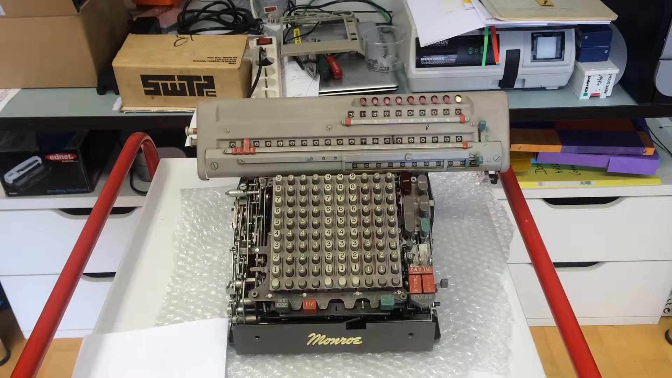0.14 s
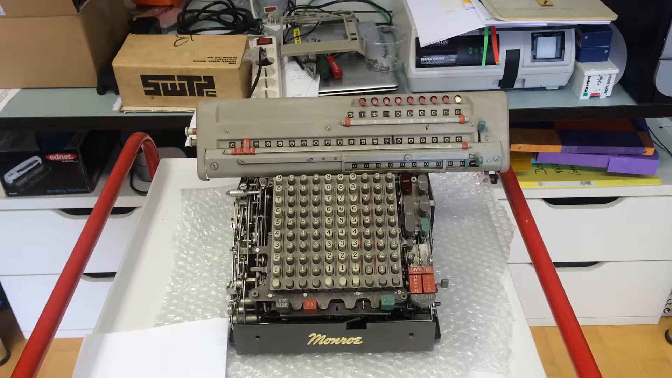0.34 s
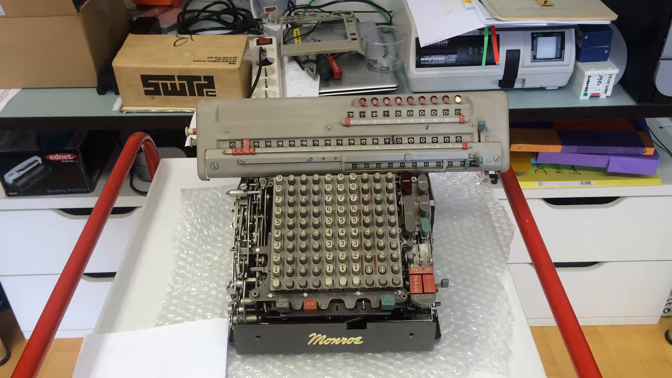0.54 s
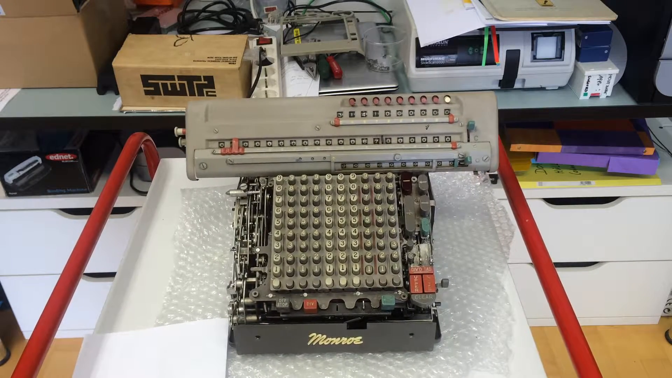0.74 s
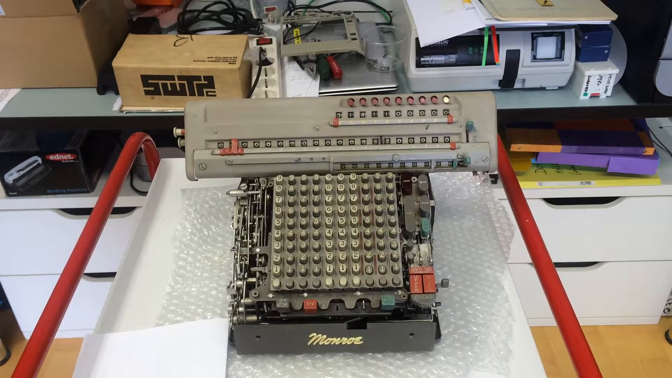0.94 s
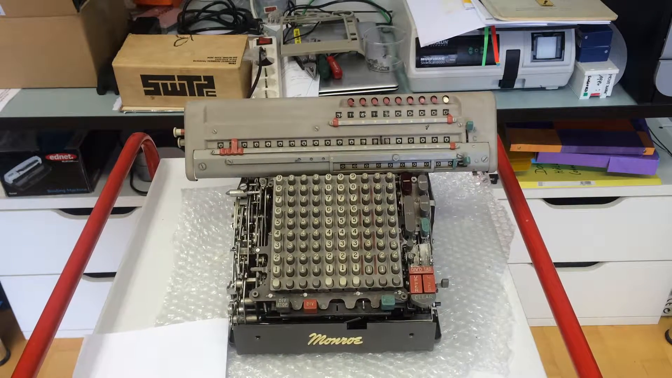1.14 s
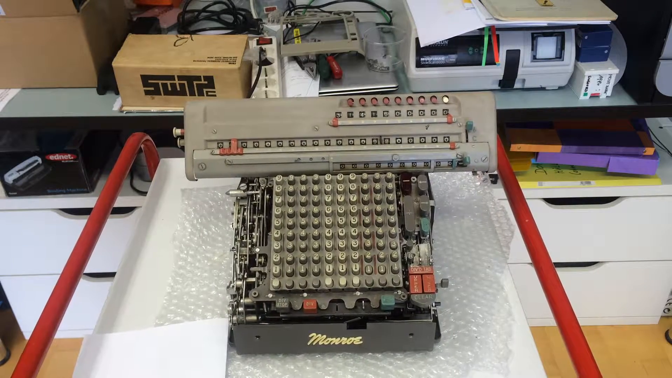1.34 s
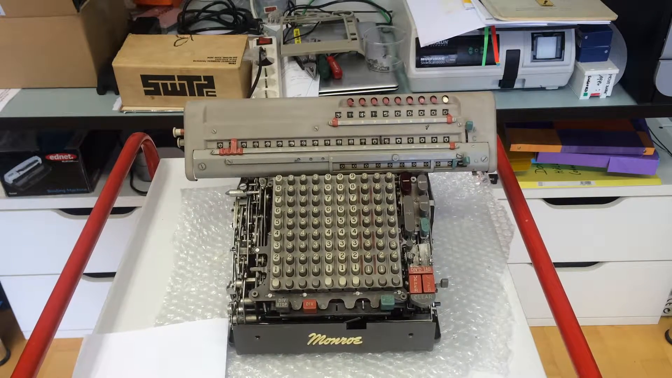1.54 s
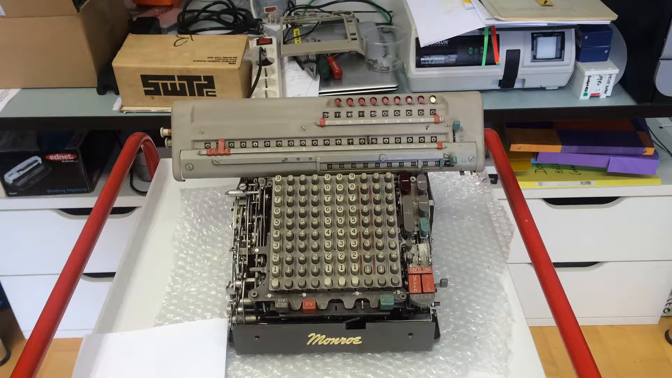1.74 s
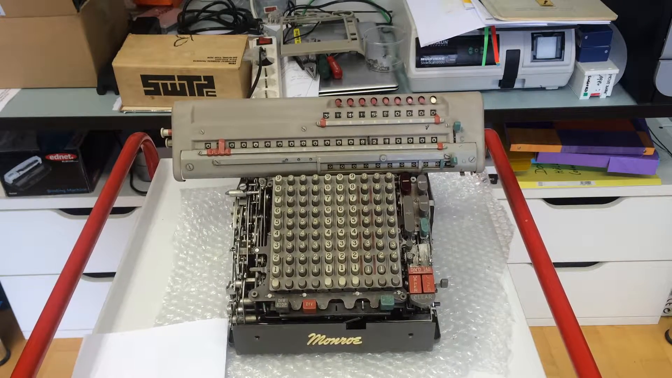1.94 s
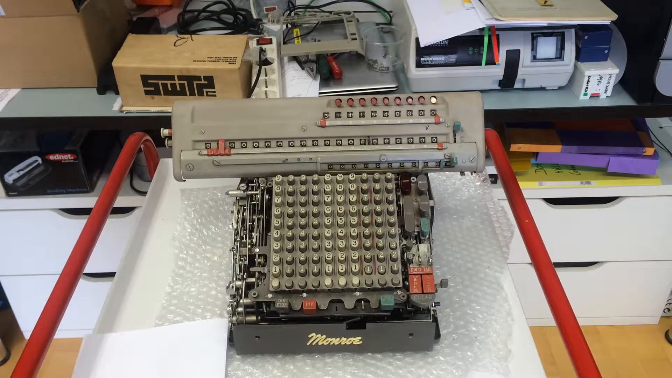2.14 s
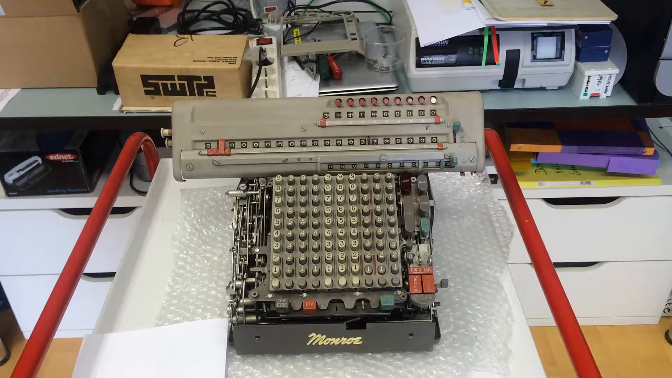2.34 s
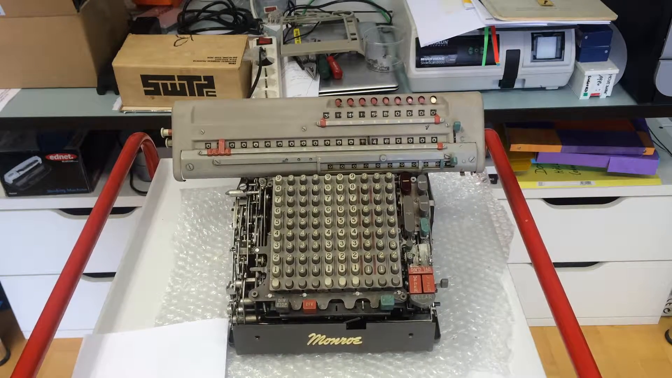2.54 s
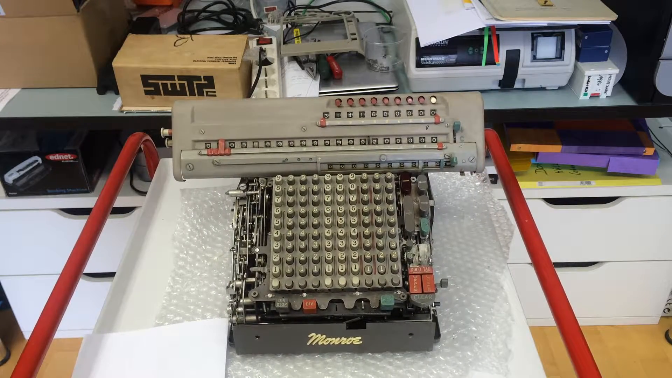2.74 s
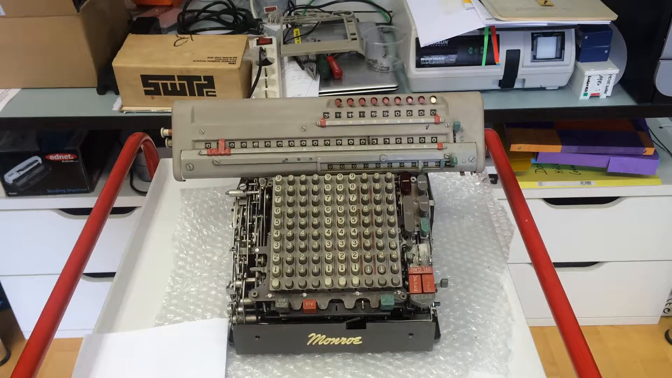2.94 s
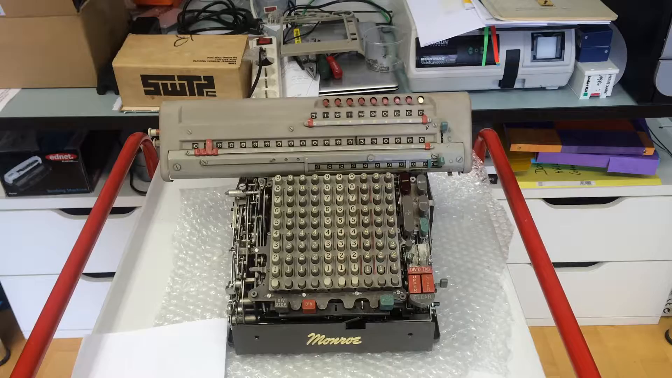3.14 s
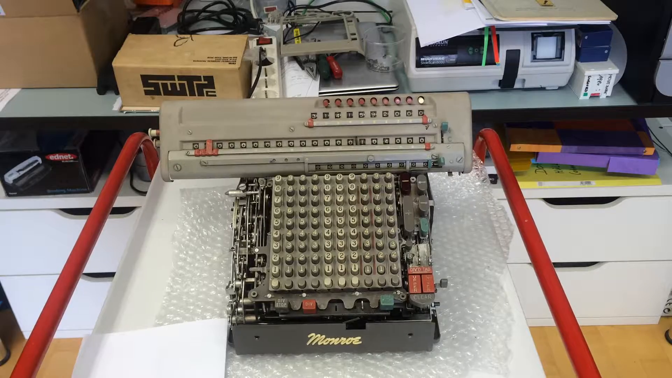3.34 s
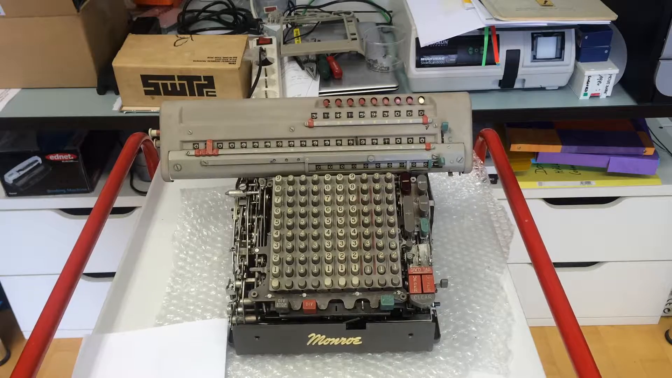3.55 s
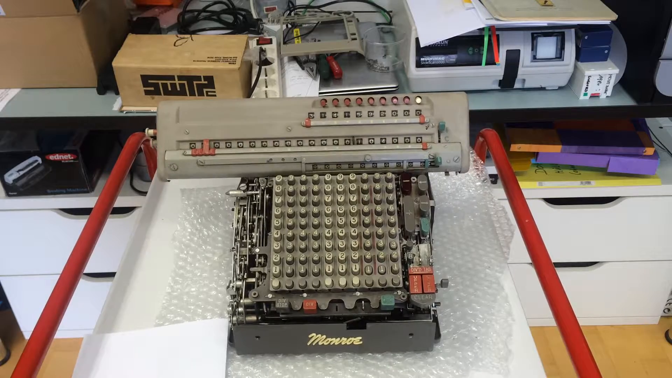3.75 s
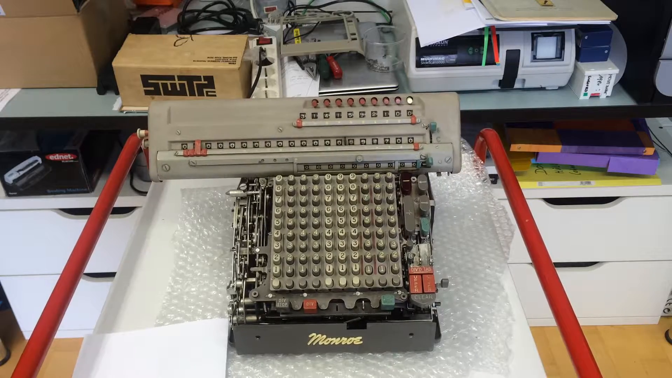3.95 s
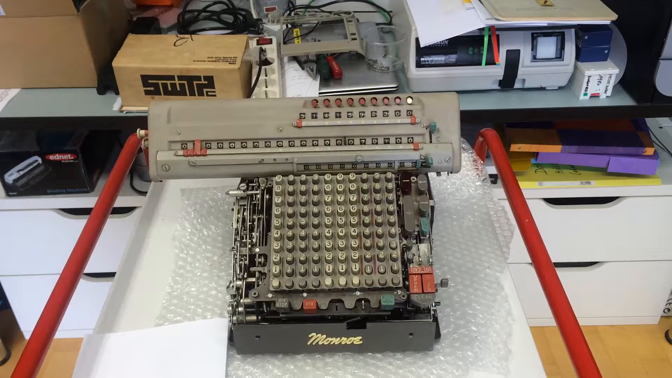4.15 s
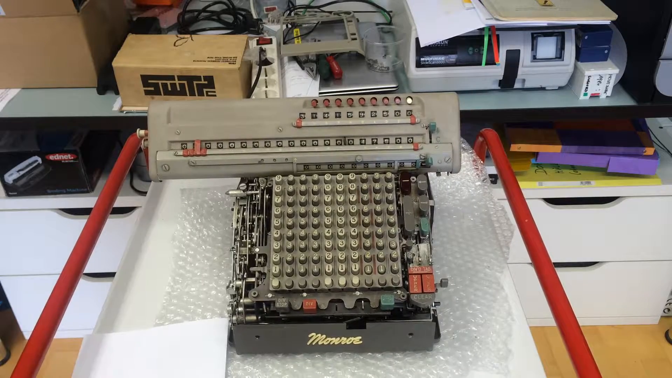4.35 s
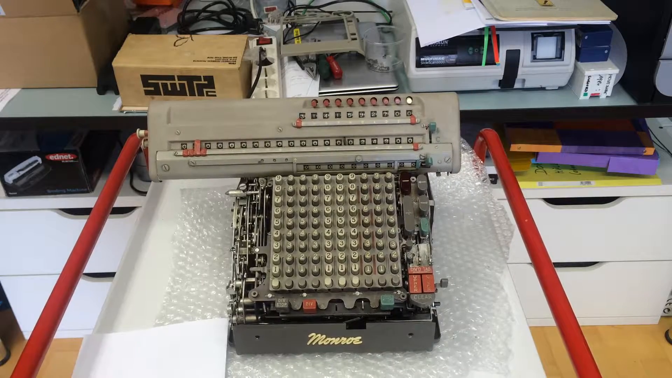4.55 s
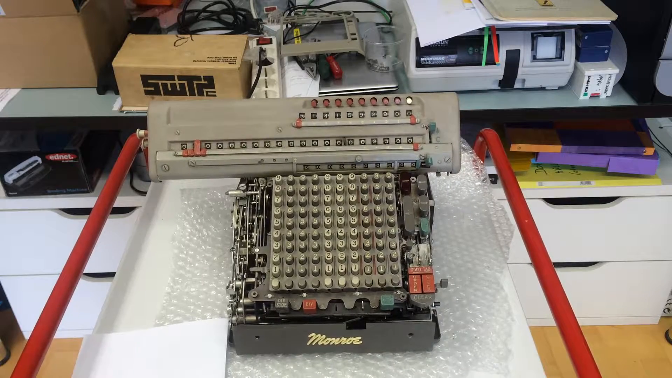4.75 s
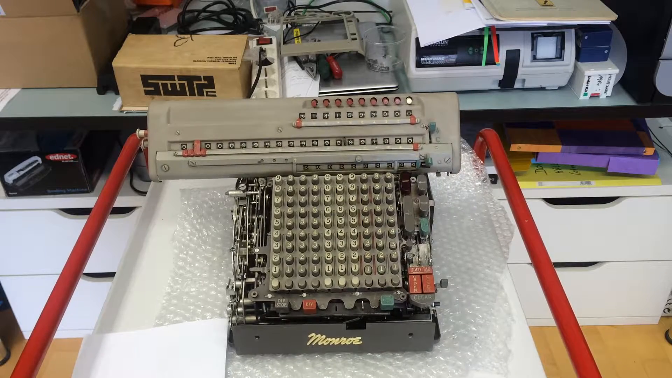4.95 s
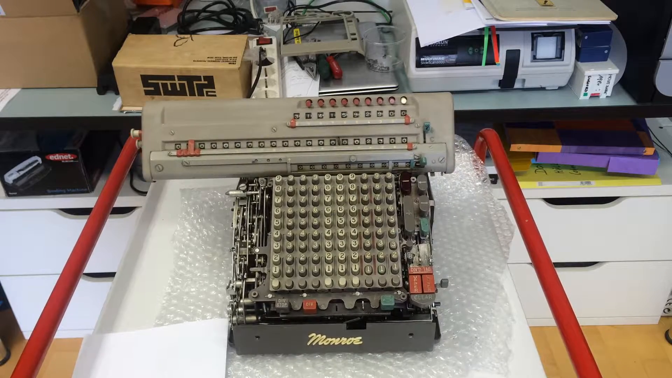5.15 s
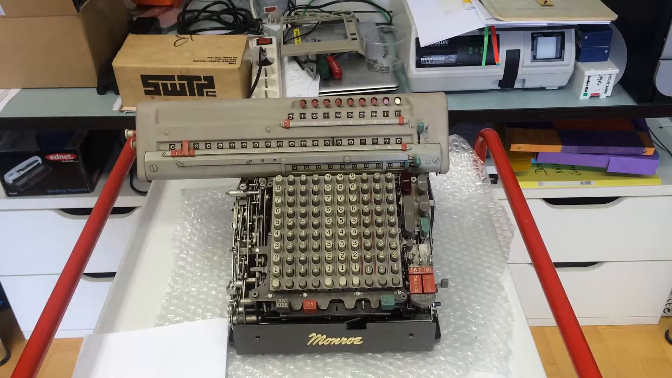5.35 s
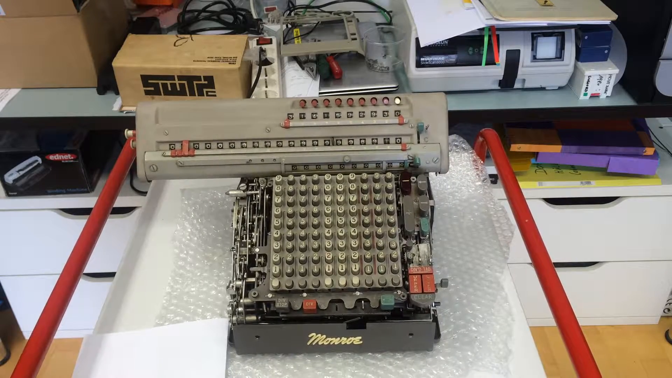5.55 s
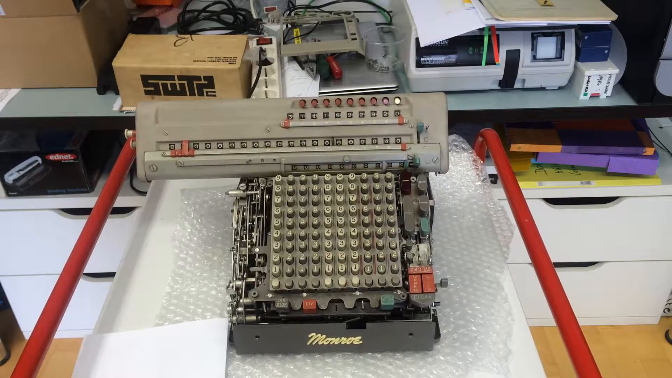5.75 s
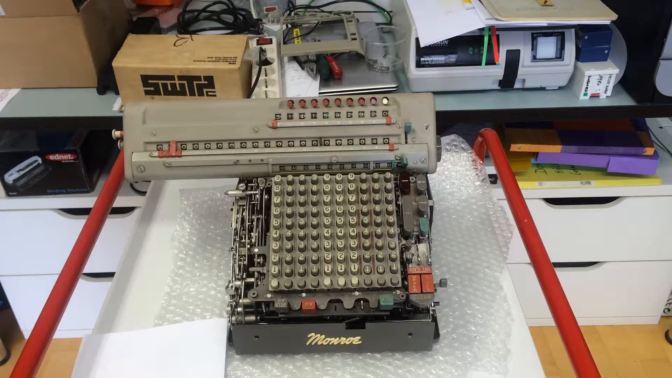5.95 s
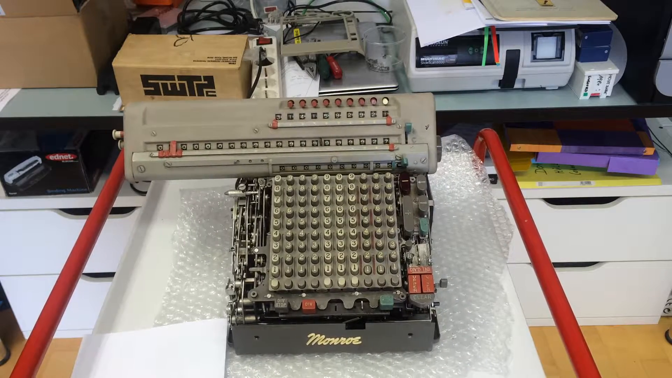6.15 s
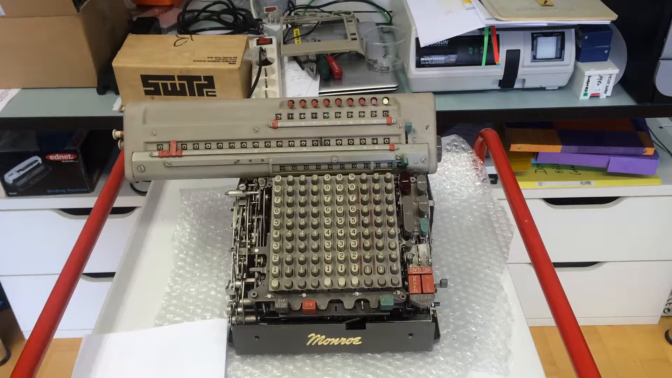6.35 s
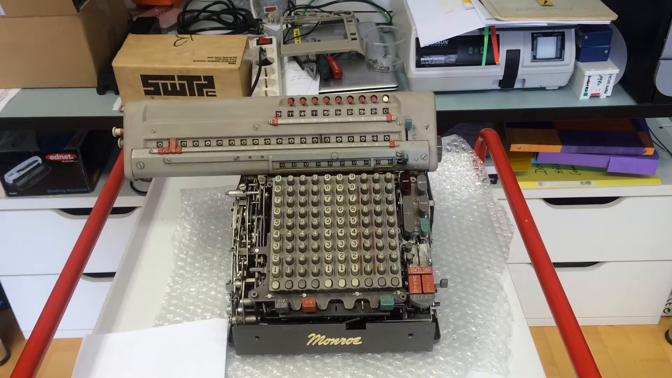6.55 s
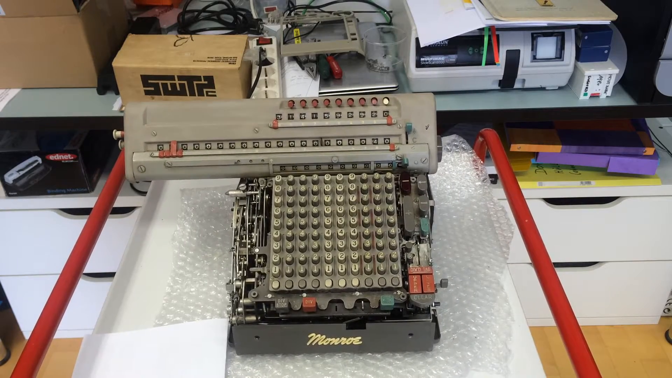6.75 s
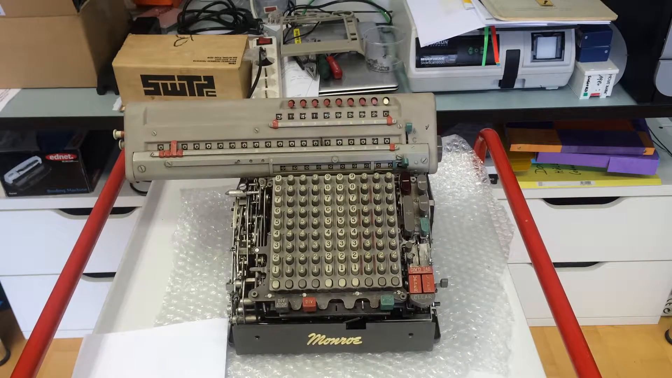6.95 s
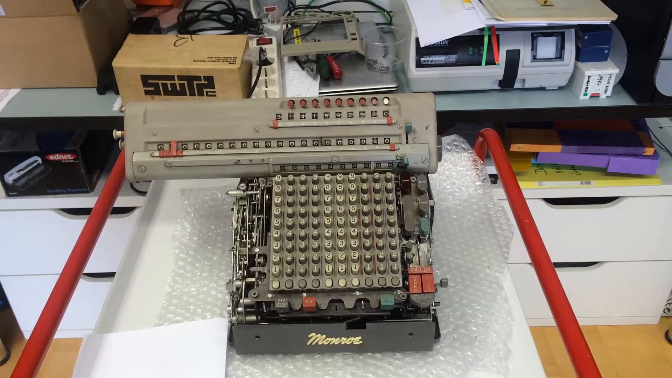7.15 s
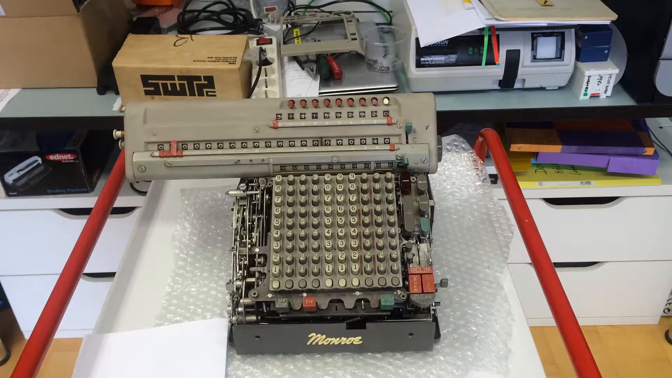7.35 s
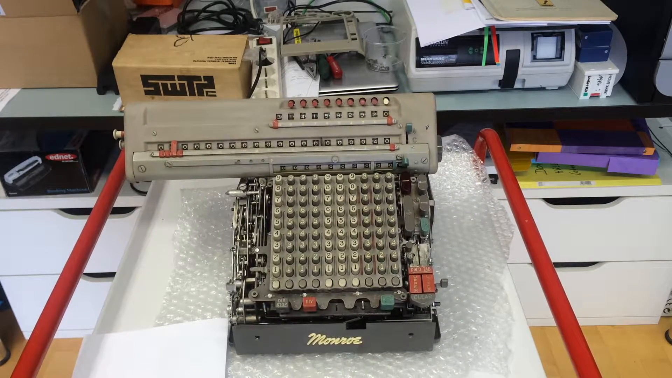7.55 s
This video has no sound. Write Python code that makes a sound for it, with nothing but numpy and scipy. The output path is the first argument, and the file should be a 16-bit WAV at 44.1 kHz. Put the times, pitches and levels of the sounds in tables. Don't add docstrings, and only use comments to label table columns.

```python
import sys
import numpy as np
from scipy import signal
from scipy.fft import rfft, irfft, next_fast_len
from scipy.io import wavfile

SR = 44100
rng = np.random.default_rng(int(sys.argv[2]) if len(sys.argv) > 2 else 0)


def wrap_up_sound(samples):
    columns = np.atleast_2d(samples).T
    tamed = np.clip(columns, -1, 1)
    steps = np.round(tamed * 32767).astype(np.int16)
    wavfile.write(sys.argv[1], SR, steps)


def gain_from_db(level_db):
    decades = np.asarray(level_db, float) / 20
    return 10 ** decades


N = 335733

# time in seconds, effort in dB.
LIFTS = [(.4794, 0), (1.4572, 0), (2.827, 0), (3.5305, 0), (4.9169, -0.5), (5.6239, -1), (6.1368, -1)]
PAWLS = [(.548, 2.5), (1.5324, -1.5), (2.8969, .6), (3.6069, .6), (4.9898, -1), (5.694, 1), (6.2121, 1)]
LOCKS = [
    (-.014, 5),
    (.5689, -2),
    (1.5614, -.6),
    (2.9404, -1),
    (3.6459, 0),
    (5.03, 1.5),
    (5.736, 0),
    (6.2448, 1),
]
RELEASES = [(.1037, 0.23), (.6873, 0.11), (1.6835, -0.67), (3.0689, -0.13), (3.7734, -0.39),
            (5.1572, -0.33), (5.8656, -0.11), (6.3702, 0)]
RESUMES = [(.2458, 2), (.8496, 2), (1.8308, 0.22), (3.2047, -0.2), (3.909, 0), (5.2939, -1.01),
           (6.0003, 0.099)]
# time in seconds, effort in dB, cam on its bracket in dB.
TURNS = [(0.4465, 1, -36.5), (1.04, -0.5, -34.5), (1.1368, 0.5, -31.5), (1.239, 4, -34.5), (1.3304, 1, -34),
         (1.4254, 2, -30), (2.0257, -0.5, -32), (2.1239, 1, -36.5), (2.2243, 3.5, -38), (2.3184, 1, -35.5),
         (2.4097, 0.5, -33.5), (2.5074, 1.5, -33.5), (2.603, -0.5, -33.5), (2.6974, 1, -36.5),
         (2.793, 0.5, -36.5), (3.4055, -1, -39), (3.4993, 0.5, -36), (4.112, -1.5, -41.5),
         (4.208, 0.5, -38), (4.3053, 3.5, -34), (4.4016, -1, -40.5), (4.4971, -0.5, -39), (4.593, 1.5, -37),
         (4.6898, -0.5, -46.5), (4.789, -0.5, -40), (4.8847, 1, -43.5), (5.5001, -0.5, -42),
         (5.592, 2, -35)]


def evened(x):
    return x / np.sqrt(np.mean(x ** 2) + 1e-20)


def read(points, hz):
    point_hz, value = np.transpose(points)
    return np.interp(np.log(hz + 1), np.log(point_hz + 1), value)


def curve(rows):
    s, *columns = np.transpose(rows)
    return [np.interp(np.arange(N) / SR, s, column, left=-120, right=-120) for column in columns]


def add(mix, s, sound):
    at = round(s * SR)
    part = sound[max(-at, 0):]
    mix[max(at, 0):][:len(part)] += part


def colour(points):
    gain_db = np.maximum(read(points, abs(np.fft.fftfreq(4096, 1 / SR))), -100)
    log_gain = np.log(gain_from_db(gain_db))
    taps = np.fft.ifft(np.exp(np.conj(signal.hilbert(log_gain)))).real[:2048]
    return taps / np.linalg.norm(taps)


def resonate(x, hz, width_hz):
    turn = np.exp(2j * np.pi * hz * np.arange(len(x)) / SR)
    pole = np.exp(-np.pi * width_hz / SR)
    return 2 * (turn * signal.lfilter([1 - pole], [1, -pole], x / turn)).real


def ticks(size, per_s, spread_db):
    when, sign, luck = rng.random((size, 3)).T
    strength = gain_from_db(-spread_db * np.log(luck + 0.0077))
    return evened((when < per_s / SR) * np.sign(sign - .5) * strength)


def rumble():
    # frequency in Hz, level in dB per Hz.
    spectrum = [(15, -51.5), (30, -28), (59, -22), (70, -10.5), (97, -11.5), (127, -16.5), (145, -8.5),
                (166, -7), (185, -14.5), (212, -26), (242, -26.5), (326, -29.5), (476, -37.5),
                (14400, -56.5), (16000, -72.5)]
    gain = gain_from_db(read(spectrum, np.fft.rfftfreq(N, 1 / SR)))
    noise = irfft(rfft(rng.standard_normal(N)) * gain, N)
    return gain_from_db(-56.5) * evened(noise)


def motor():
    # time in seconds, line in dB, case drone in dB.
    levels = [
        (0, -58, -60.5),
        (2.5, -61.5, -62.5),
        (5, -61, -59),
        (6.75, -59.5, -58.5),
        (6.95, -72.5, -73.5),
    ]
    line_db, drone_db = curve(levels)
    shake = rng.standard_normal((N, 2)).T
    line = evened(resonate(resonate(shake[0], 288, 14), 293, 30))
    drone = evened(resonate(resonate(shake[1], 170, 60), 152, 110))
    return gain_from_db(line_db - 1.8) * line + gain_from_db(drone_db) * drone


def room(x, count=4):
    # frequency in Hz, t60 in seconds.
    decay = [(250, 0.28), (700, 0.2386), (1800, 0.242), (4600, 0.2854), (12000, 0.268)]
    out = np.zeros(N)
    wander = 2 * np.pi * 23.5 * np.arange(N) / SR
    for k in range(count):
        taps = np.zeros(SR // 2)
        at = np.arange(120, len(taps) - 12, 12)
        taps[at + rng.integers(0, 12, len(at))] = rng.choice([-1., 1.], len(at))
        hz, t, z = signal.stft(taps, SR, nperseg=256)
        fading = z * gain_from_db(-60 * t / read(decay, hz)[:, None])
        tail = signal.istft(fading, SR, nperseg=256)[1]
        share = np.sqrt(2 / count) * np.cos(wander + np.pi * k / count)
        out += signal.fftconvolve(x * share, tail / np.linalg.norm(tail))[:N]
    return out


def struck(modes, rise_ms):
    t = np.arange(5000) / SR
    ring = sum(gain_from_db(db - 60 * t / t60) * np.sin(2 * np.pi * (hz * t + rng.random())) for hz, db, t60 in modes)
    ring *= np.minimum(t * 1000 / rise_ms, 1)
    return ring / abs(ring).max()


def knocks():
    # frequency in Hz, level in dB, t60 in seconds.
    bracket = [(1787, 0.5, 0.044), (1399, -5, 0.035)]
    carriage = [(573, -3, .04), (1000, -5, .03), (1284.5, -1.5, .03), (1575, 1.5, .03), (1769, -1.5, .03)]
    pawl_arm = [(4566, -4, .018), (5285, -0.5, .025), (6330, -6, .018), (10300, -4.5, .015)]
    detent = [(759, -9, .025), (971.5, -6, .025), (1642, -3, .02), (2158, -1, .022), (2981, 1.5, .025),
              (12210, -4, .01)]
    housing = [(346.8, -9.5, 0.034), (632, -5.5, .04), (921.2, 1, 0.033), (1369, 1.5, 0.038)]
    clutch = [(648, -15, 0.027), (920, -4.5, 0.028), (1092, -1, 0.0346), (1313, -2, 0.026),
              (1524, -1, 0.036), (1677, 0, .04), (2282, 0.5, 0.035)]
    desk = [(141.6, -2, .1), (299.8, -5, 0.097), (474.4, -4, 0.067)]
    hits = [(s + .003, cam_db - .7, bracket) for s, _, cam_db in TURNS]
    for events, delay_s, part_db, part in [
            (RESUMES, .107, -37, bracket),
            (LIFTS, .006, -25, carriage),
            (PAWLS, .001, -21, pawl_arm),
            (LOCKS, .001, -19, detent),
            (RELEASES, -.038, -30, bracket),
            (RELEASES, .001, -21, pawl_arm),
            (RELEASES, .002, -31, housing),
            (RELEASES, .032, -28, housing)]:
        hits += [(s + delay_s, part_db + effort_db, part) for s, effort_db in events]
    out = np.zeros(N)
    for s, db, part in hits:
        shifted = [(hz * rng.uniform(0.96, 1.04), mode_db + rng.normal(0, 2.2), t60)
                   for hz, mode_db, t60 in part]
        add(out, s, gain_from_db(db) * struck(shifted, rise_ms=2.16))
    add(out, 6.6362, gain_from_db(-13) * struck(clutch, rise_ms=.8))
    add(out, 6.777, gain_from_db(-31) * struck(desk, rise_ms=3.5))
    return out


def gears():
    # time in seconds, tooth rattle in dB, load on the frame in relative dB.
    coast = [
        (6.47, -39.5, -11),
        (6.57, -26.5, -2.5),
        (6.62, -34, -3.5),
        (6.7, -48, -9),
        (6.76, -43, -3.5),
        (6.8, -58.5, -8.5),
        (6.88, -56, 1.5),
        (7.0, -65.5, 0.5),
        (7.1, -69, -6),
    ]
    # (delay in seconds, rise in seconds, top in dB, hold in seconds, drift in dB,
    # fall in dB per second), load on the frame in dB.
    lift_gears = (-.012, 0.14, -27.5, .07, -5.5, 300), -5.5
    lock_gears = (-.003, -0.17, -29.5, .046, -3.5, 290), -4.5
    release_gears = (-.056, .022, -29, .077, 2.5, 200), -6
    resume_gears = (-.008, 0.0261, -33.5, 0.0639, 2.5, 109), -7
    turn_gears = (-.008, .014, -36.5, .04, -3, 170), -5
    coast_db, coast_load_db = curve(coast)
    idle = gain_from_db(2 * -42.2) * (np.arange(N) < coast[1][0] * SR)
    levers = idle + gain_from_db(2 * coast_db)
    frame = idle * gain_from_db(2 * -3) + gain_from_db(2 * (coast_db + coast_load_db))
    t = np.arange(SR // 2) / SR
    for events, (shape, load_db) in [(LIFTS, lift_gears), (LOCKS, lock_gears), (RELEASES, release_gears),
                                     (RESUMES, resume_gears), (TURNS, turn_gears)]:
        delay_s, rise_s, top_db, hold_s, drift_db, fall_db_per_s = shape
        level_db = top_db + drift_db * np.clip((t - rise_s) / hold_s, 0, 1)
        level_db -= fall_db_per_s * np.maximum(t - rise_s - hold_s, 0)
        power = gain_from_db(2 * level_db) * np.minimum(t / rise_s, 1) ** 2
        for s, effort_db, *_ in events:
            add(levers, s + delay_s, power * gain_from_db(effort_db))
            add(frame, s + delay_s, power * gain_from_db(effort_db + 2 * load_db))
    return np.sqrt(levers), np.sqrt(frame)


def blows():
    # delay in seconds, peak in dB, weight reaching the frame in dB,
    # length of the chatter in ms, thinness 0-1.
    lift = [
        (0, -15.5, -10.5, 9.4, 0),
        (.009, -15.5, -10, 10, 0.3),
        (.018, -17.5, -11.5, 8, .2),
        (.041, -17, -14, 8.3, 0.3),
    ]
    pawl = [
        (0.00067, -12, -23.5, 10, .8),
    ]
    lock = [
        (0, -8.5, -15, 11, .6),
        (.05, -18.5, -17.5, 9, .2),
    ]
    release = [
        (-.044, -19, -14, 11, 0.31),
        (-.035, -16, -13, 11, .3),
        (-.009, -19, -18, 5, 0.41),
        (0, -10, -18, 10.8, 0.58),
        (.031, -14, -14, 14, .4),
        (.052, -24, -14.5, 9, .2),
    ]
    resume = [
        (-.0125, -25.5, -20, 6, .5),
        (0, -19.5, -15, 14, .6),
        (.024, -21.5, -10, 9, .3),
        (.052, -22, -7, 11, .2),
        (.07, -23.5, -12, 9, .3),
        (.092, -22, -20, 9, .4),
        (.105, -19, -19, 11, .4),
    ]
    turn = [
        (-.032, -31, -14, 9, .3),
        (-.021, -29, -14, 7, 0.48),
        (0, -21.5, -16, 13, .5),
        (.021, -26.5, -14, 9, .3),
    ]
    # time in seconds, then as in the volleys.
    last_blows = [(6.4857, -26.5, -17.5, 11.7, 0.29), (6.4988, -17.5, -15, 12, 0.29),
                  (6.511, -21, -12.5, 6, 0.28), (6.547, -13, -13.5, 8.7, 0.37), (6.57, -19.5, -8.5, 11, .1),
                  (6.5893, -18, -16, 12, .2), (6.6368, -12.5, -21, 8.7, .3), (6.6518, -18.5, -16.5, 8, .8),
                  (6.6888, -15, -28.5, 7.9, .7), (6.7315, -23, -16, 4, .3), (6.766, -27, -12, 9, 0.79),
                  (6.772, -18.5, -14.5, 9, .7), (6.779, -12, -11, 7, 0.27), (6.785, -25, -10, 6.4, 0.34)]
    uneven_db, uneven_s = 1.2, .0012
    rows = []
    for events, volley in [(LIFTS, lift), (PAWLS, pawl), (LOCKS, lock), (RELEASES, release),
                           (RESUMES, resume), (TURNS, turn)]:
        for s, effort_db, *_ in events:
            luck = np.clip(rng.standard_normal((len(volley), 3)), -2, 2)
            for (delay_s, db, weight_db, ms, thin), (late, hard, heavy) in zip(volley, luck):
                varies = delay_s != 0
                rows.append((s + delay_s + uneven_s * late * varies,
                             db + effort_db + uneven_db * hard * varies,
                             weight_db + uneven_db * heavy, ms, thin))
    return rows + last_blows


def contacts(count=16):
    rattle, load = gears()
    on_levers = rattle * gain_from_db(-3.4) * ticks(N, per_s=4500, spread_db=3.0)
    on_frame = load * gain_from_db(-7.5) * ticks(N, per_s=2500, spread_db=5.5)
    t_ms = np.arange(2000) / SR * 1000
    for s, db, weight_db, ms, thin in blows():
        shape = 0.349 * np.exp(-t_ms / 1.28) + 0.5355 * np.exp(-t_ms / max(ms, .5))
        shape *= np.minimum(t_ms / .85, 1)
        chatter = ticks(len(t_ms), per_s=9000, spread_db=1.0)
        chatter = evened(signal.lfilter([1, -thin], 1, chatter))
        add(on_levers, s, gain_from_db(db - 3.1) * shape * chatter)
        add(on_frame, s, gain_from_db(db + weight_db) * shape * ticks(len(t_ms), per_s=4000, spread_db=1.5))
    lever_hit = rng.integers(0, count, N // 40 + 1).repeat(40)[:N]
    return on_levers * (lever_hit == np.arange(count)[:, None]), on_frame


def lever(t60, ring_db, count=60):
    t = np.arange(500) / SR
    place, phase, life = rng.random((count, 3, 1)).transpose(1, 0, 2)
    hz = 1200 + 15500 * (np.arange(count)[:, None] + place) / count
    modes = np.sin(2 * np.pi * (hz * t + phase)) * gain_from_db(-60 * t / (t60 * (0.48 + life)))
    ring = modes.sum(0)
    ring *= gain_from_db(ring_db) / np.linalg.norm(ring)
    ring[0] += 1
    return ring / np.linalg.norm(ring)


def mechanism():
    # frequency in Hz, level in dB per Hz.
    steel_colour = [(880, -24), (1500, -3), (1840, -4.5), (2630, -1.2), (4310, -2), (5290, -1),
                    (6870, -0.5), (13000, -3), (15200, -5)]
    # frequency in Hz, level in dB per Hz.
    frame_body = [(220, -48), (380, -13.5), (453, -5.5), (645, -4), (806, -4), (1320, 1), (1840, 0),
                  (3500, -2.5), (4550, -31.5), (7700, -120)]
    # frequency in Hz, width in Hz, level in dB.
    frame_modes = [(655, 50, -29), (1138, 60, -7), (1300, 90, 7), (1421, 70, -22.5), (1795, 90, 13),
                   (1944, 89, -3)]
    # frequency in Hz, width in Hz, level in dB.
    spring = (13520, 90, -26)
    on_lever, on_frame = contacts()
    steel = sum(signal.oaconvolve(force, lever(t60=0.0076, ring_db=-2.0))[:N] for force in on_lever)
    steel = signal.oaconvolve(steel, colour(steel_colour))[:N]
    spring_hz, spring_width_hz, spring_db = spring
    steel = steel + gain_from_db(spring_db + 21) * resonate(steel, spring_hz, spring_width_hz)
    click = np.eye(1, 6000)[0]
    modes = sum(gain_from_db(db) * resonate(click, hz, width_hz) for hz, width_hz, db in frame_modes)
    frame = colour(frame_body) + gain_from_db(-5) * (modes / np.linalg.norm(modes))[:2048]
    return steel + signal.oaconvolve(on_frame, frame / np.linalg.norm(frame))[:N]


def scene():
    machine = mechanism() + knocks()
    mix = machine + gain_from_db(-4.0) * room(machine) + gain_from_db(0.6) * motor() + rumble()
    return mix[None]


def roll_off(x):
    return signal.sosfilt(signal.butter(12, 16520, fs=SR, output="sos"), x)


def record(dry):
    # frequency in Hz, gain in dB.
    top_edge = [(15240, 0), (15320, -24), (16000, -52), (16600, -75)]
    size = next_fast_len(N + SR // 2)
    gain = gain_from_db(read(top_edge, np.fft.rfftfreq(size, 1 / SR)))
    limited = irfft(rfft(dry, size) * gain, size)[:, :N]
    return roll_off(limited)


dry = scene()
out = record(dry)
wrap_up_sound(out)
```